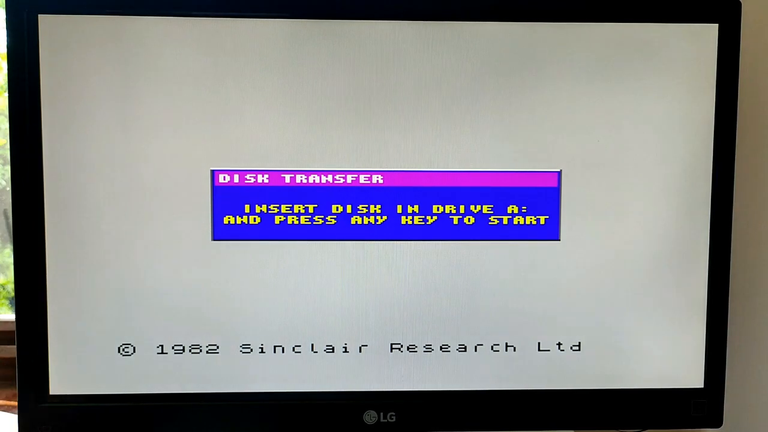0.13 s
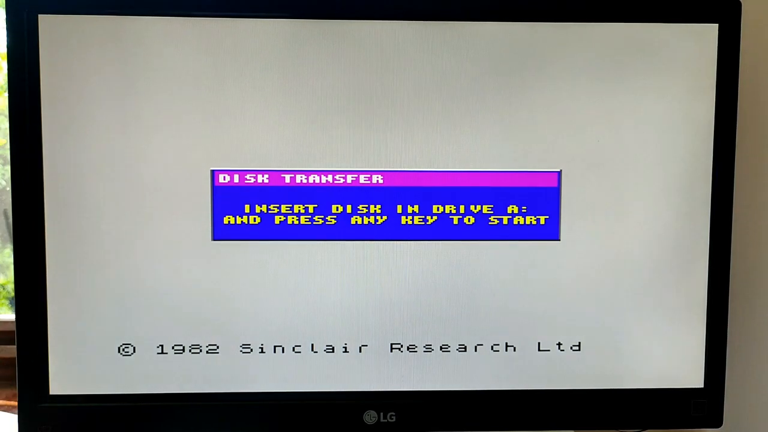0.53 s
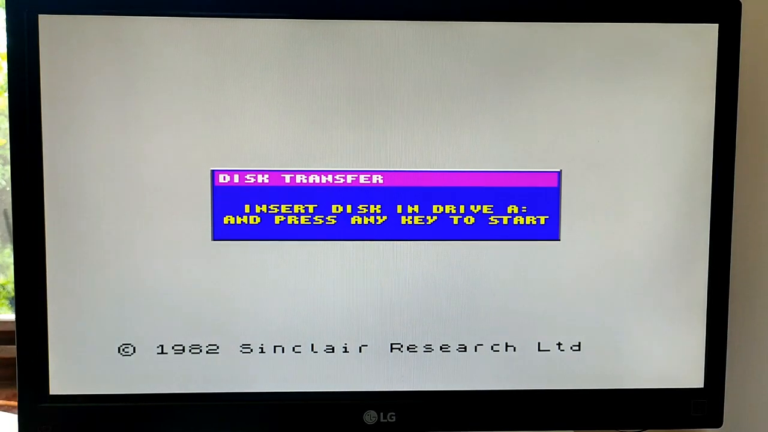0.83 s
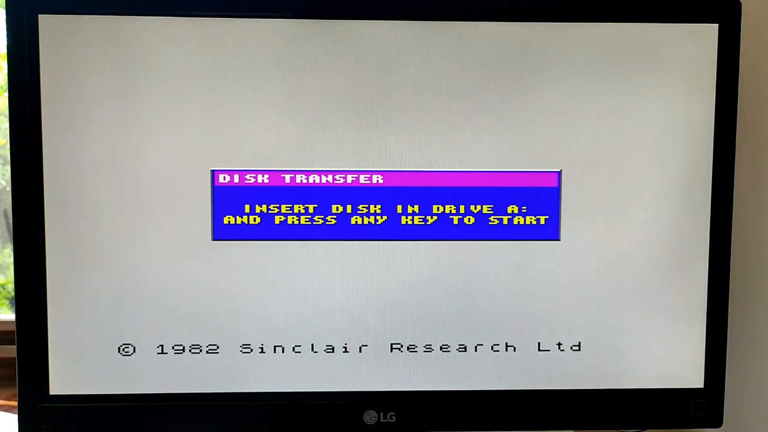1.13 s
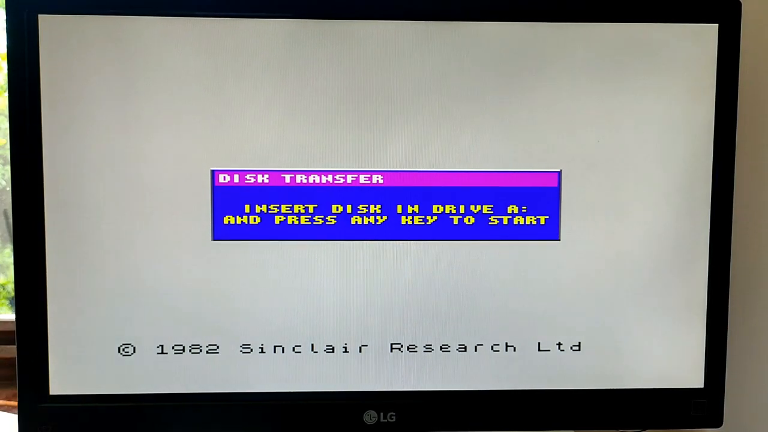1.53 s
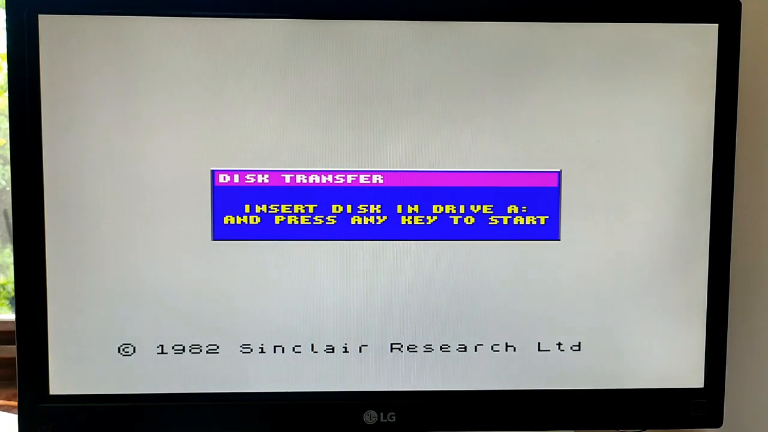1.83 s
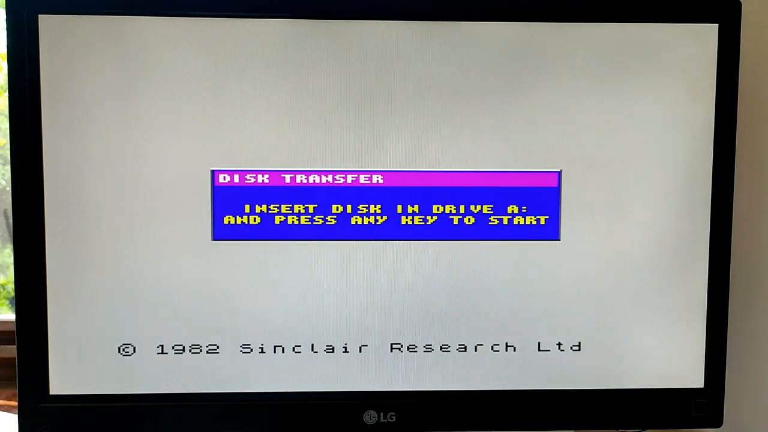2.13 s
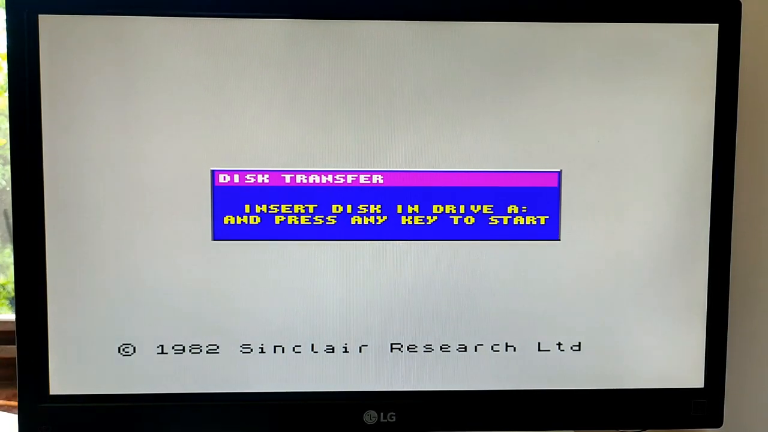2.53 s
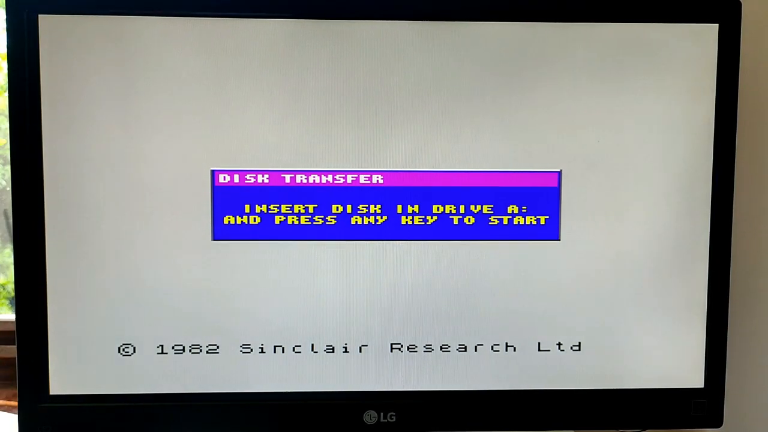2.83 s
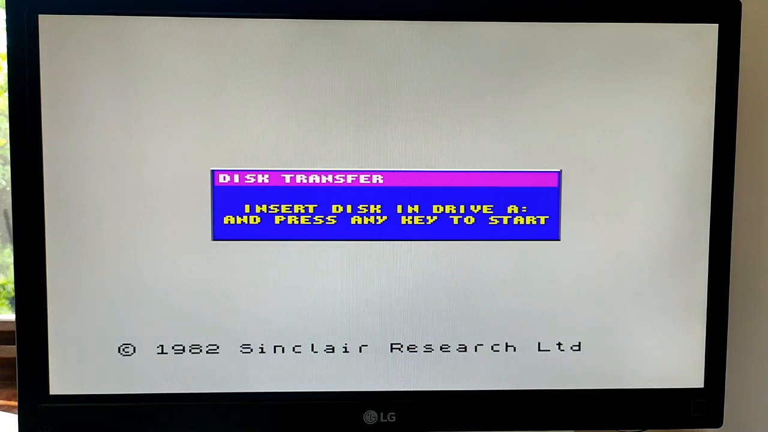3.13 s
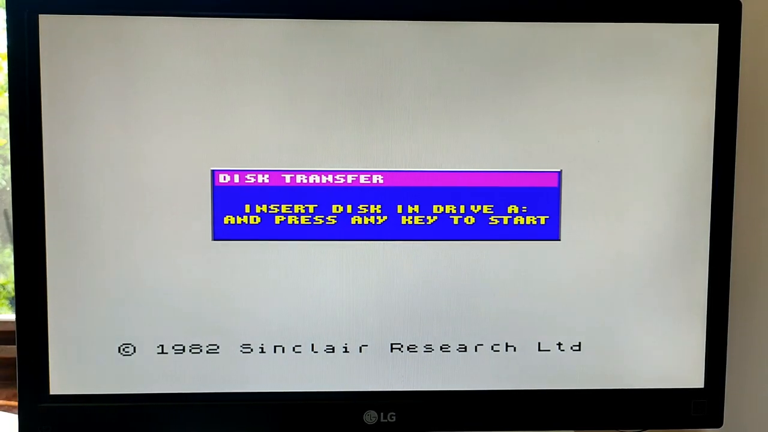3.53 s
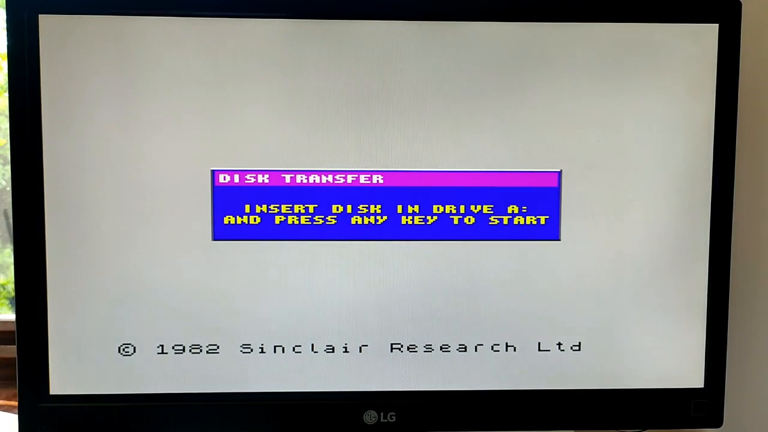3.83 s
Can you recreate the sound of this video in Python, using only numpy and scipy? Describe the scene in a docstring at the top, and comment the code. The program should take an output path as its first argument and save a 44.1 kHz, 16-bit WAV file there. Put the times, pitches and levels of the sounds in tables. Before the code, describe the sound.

Floppy disk handled near a computer: early clatter and scuffs, sparse light clicks, then insertion scrapes and a loud seating clack at the end. Constant airy fan hum, small room, slightly dull microphone with no extreme treble.

```python
"""A computer fan runs throughout: shaped noise for the rushing air, wavering sines for the hum and thin whine.
A plastic floppy disk is picked up with rattles and hollow notes, then slid and turned in the hand;
the scuffs are noise and tiny random slips through a sinking resonance.
Near the end it is pushed into a drive, which seats it with a loud clack: a rattle ringing the metal frame.
Heavier knocks boom in the desk, and a small room answers the clacks and scuffs."""
import sys
import numpy as np
from scipy import signal
from scipy.fft import rfft, irfft, next_fast_len
from scipy.io import wavfile
from scipy.ndimage import uniform_filter1d, map_coordinates

SR = 44100
rng = np.random.default_rng(int(sys.argv[2]) if len(sys.argv) > 2 else 0)


def output_pcm(signal):
    """Save a mono or channel-first signal as 16-bit PCM at the path in sys.argv[1].

    Samples are clipped to [-1, 1] before scaling.
    """
    pcm = np.clip(np.atleast_2d(signal).T, -1, 1) * 32767
    wavfile.write(sys.argv[1], SR, np.round(pcm).astype(np.int16))


N = 176400  # samples, 4 s

# Rushing air of the fan. Each row: frequency in Hz, relative level per Hz in dB.
FAN_AIR_COLOUR = [(25, -26), (60, -18), (100, -5), (160, 6.5), (230, -3.5), (310, 6.5), (360, -3.5),
                  (750, -1.5), (1000, -4), (1300, -15.5), (1800, -11.5), (2400, -21), (2750, -27.5),
                  (3100, -18.5), (3600, -12), (4150, -27.5), (5400, -36), (6300, -21), (6800, -38),
                  (8000, -49)]
# Narrow resonances in the fan's hiss. Each row: frequency in Hz,
# distance from the centre to 12 dB down in Hz, relative level in dB.
FAN_HISS_RINGS = [(1965, 34, -5), (2110, 63, -2.5), (2555, 56, -8), (2872, 25.5, 0.5), (2990, 52, 4.5),
                  (3425, 70, -18.5), (3725, 106, -5.5), (4430, 39, -7), (4670, 50, -6.5), (4870, 50, -18.5),
                  (5200, 45, -10.5), (5560, 63, -10.5), (5600, 50, -9.5), (6146, 220, -4),
                  (6400, 90, -10.5)]
# Fan and motor tones. Each row: frequency in Hz, rms level before wavering in dB.
FAN_MOTOR_TONES = [(282.4, -62), (435, -66.5), (644, -67), (762, -72), (805, -74.5), (846, -67.5),
                   (967, -82), (1129, -64), (2901, -76), (3730, -70.5), (6062, -74.5)]
FAN_AIR_DB, FAN_RINGS_DB = -58, -67  # rms before the patches
PATCH_DB = 2.5  # depth of the patches in the hiss
WAVER_HZ, WAVER_DB = 2.59, 1.5  # unsteadiness of the tones in pitch and level

# Decay of the room. Each row: frequency in Hz, t60 in seconds.
ROOM_DECAY = [(150, 0.5), (500, 0.29), (1500, 0.24), (4000, 0.22), (8000, 0.35)]
ROOM_DB = -2  # gain of the room's answer
# Microphone response. Each row: frequency in Hz, gain in dB.
MIC_RESPONSE = [(20, 1), (7200, 1.5), (7800, -3), (8300, -16.5), (8700, -34)]
TOP_HZ = 8635  # nothing passes the plastic's colour or the microphone above this

# Knocks that reach the desk. Each row: start in seconds, level in dB.
DESK_THUMPS = [(0.223, -55.5), (1.482, -49), (2.37, -64), (2.755, -50), (3.135, -53.5), (3.381, -53),
               (3.555, -44.5), (3.948, -27.5)]
# Resonances of the desk. Each row: frequency in Hz, level in dB, t60 in seconds.
DESK_MODES = [(122.7, -3, 0.1), (151, 0.5, 0.27), (279.5, -16.5, 0.22)]

# Hollow knocks, pitched by how the disk is held. Each row: start in seconds, pitch in Hz, level in dB.
HOLLOW_KNOCKS = [(.265, 301, -42.5), (.314, 303, -33.5), (0.321, 448, -37.5), (1.816, 615, -40.5),
                 (1.835, 616, -40), (2.369, 295, -40.5), (2.91, 299, -49), (3.382, 300.5, -39)]
KNOCK_T60_S, KNOCK_ATTACK_S = 0.16, 0.0014

# Sliding strokes. Each row: peak in seconds, rise from and fall to 20 dB down in seconds,
# relative level in dB, hollow body in dB, bright edge in dB, strength of the gliding resonance in dB.
SLIDE_STROKES = [(0.239, 0.034, 0.031, -42, 4.5, -3, 6), (.305, 0.075, 0.039, -41.5, 6.5, -3, 3.5),
                 (.435, 0.086, 0.052, -37.5, -2.5, -5.5, 3.5), (.495, 0.021, 0.071, -51, 5, 2, 3),
                 (0.801, 0.24, 0.25, -60.5, 4.5, -1.5, -1.5), (1.245, 0.036, 0.2, -76, 20, 12.5, -13),
                 (1.421, 0.094, 0.069, -65.5, 4, 6, -1), (1.834, 0.029, 0.08, -53.5, 7, -0.5, 3),
                 (1.969, 0.3, 0.15, -59, 8.5, 0, 1.5), (3.074, 0.039, 0.054, -62.5, 7, 7, -1),
                 (3.147, 0.04, 0.11, -60, 4.5, 2, 0), (3.415, 0.056, 0.032, -44.5, -5, 3.5, 3.5),
                 (3.535, 0.066, 0.053, -43, -8, 3, 3.5), (3.68, .03, 0.049, -59.5, -4, 0, -3),
                 (3.925, 0.034, 0.031, -47.5, 2.5, -1.5, -1)]
# Colour of sliding plastic. Each row: frequency in Hz, relative level per Hz in dB.
SLIDING_COLOUR = [(40, -51), (130, -21.5), (220, -4.5), (320, 6.5), (560, 4), (1400, 5), (2400, 1.5),
                  (3600, 2), (5000, -2.5), (5900, -4), (6500, 2.5), (7200, -8.5), (8000, -17)]
GRAINS_PER_S, GRAIN_SPREAD_DB = 3000, 2  # mean rate of the slips, spread of their levels
SCUFF_SHARE = 0.77  # steady noise against the slips
SLIP_UNEVEN_DB = 2.16
# Resonance at a stroke's peak, how fast it sinks, how wide it is.
GLIDE_HZ, GLIDE_OCT_PER_S, GLIDE_WIDTH_OCT = 2260, 8.8, 0.48

# Contacts of the disk. Each row: start in seconds, relative level in dB, hollow body in dB,
# bright edge in dB, rattle t60 in seconds.
DISK_CLACKS = [(0.1524, -33.5, 10.5, -5.5, 0.092), (0.2142, -39.5, 9.5, 6, 0.056),
               (0.292, -42, 2, -3.5, 0.081), (0.3141, -32, 3, -19, 0.052), (.597, -41.5, 2, -2, 0.13),
               (0.7487, -54.5, 2, 7.5, 0.083), (.8022, -60, -9, 6, 0.055), (1.4807, -38.5, -1, -3.5, .045),
               (1.8348, -51.5, 17, 6, 0.055), (1.9805, -50.5, -17, 6.5, 0.048), (2.3678, -49, 8, 6, 0.1),
               (2.756, -59, 16, -5, 0.042), (2.9, -53, -2, -2, 0.06), (2.907, -34, -5, -9, 0.041),
               (3.116, -54.5, 12, 5.5, 0.068), (3.3554, -51, 5, 3.5, 0.16), (3.3784, -38, 1, 2, 0.1),
               (3.403, -46.5, 12, -5, .06), (3.5085, -40, -7, 2.5, 0.049), (3.5526, -28, -4, -2.5, 0.075),
               (3.57, -43.5, 12, -8, 0.038), (3.9022, -41.5, -4, -4.5, 0.064), (3.9322, -34, -6, 6, 0.15),
               (3.9382, -17.5, -3, 1.5, 0.058), (3.947, -25, -6, 12, 0.025)]
# Colour of a contact. Each row: frequency in Hz, relative level per Hz in dB.
CONTACT_COLOUR = [(40, -37.5), (110, -20), (200, -12), (310, 3), (600, 1), (1200, 2), (1900, 1.4),
                  (2600, -1), (3400, 1), (5000, -7), (6700, -1), (8000, -16.5)]
# Rings of the disk shell. Each row: frequency in Hz, level in dB, t60 in seconds.
SHELL_MODES = [(405, -6.5, 0.21), (529, -4, 0.077), (836, -12, 0.14), (1166, 2, 0.09), (1857, -19, 0.14),
               (2964, 3, 0.054), (3646, -4.5, 0.14), (6600, -11.5, 0.22)]
# Rings of the drive's metal frame. Each row: frequency in Hz, level in dB, t60 in seconds.
FRAME_MODES = [(1104, -5, .15), (1520, -3, 0.1), (2050, 0, 0.048), (3400, -6, 0.018), (4370, -10.5, .14),
               (4570, 5.5, .08), (5520, -9, 0.099), (5800, -11, 0.14), (6374, -12, 0.16), (6939, -24, .14)]
INSERT_S = 3.3  # from here contacts ring the frame instead of the shell
SHELL_DB, FRAME_DB, ATTACK_S = -13, -21, 0.0021  # gains of the rings, rise of a contact
CLACK_TRIM_DB = 1.5  # lifts every contact
BODY_HZ, EDGE_HZ = 1410, 3200  # corners of the hollow and bright shelves


def amp(db):
    """Decibels to gain."""
    return 10 ** (np.asarray(db) / 20)


def unit(x):
    """Scaled to rms 1."""
    return x / np.sqrt(np.mean(x ** 2) + 1e-20)


def along(points, hz):
    """(Hz, value) points read along a log frequency axis."""
    f, v = np.transpose(points)
    return np.interp(np.log(hz + 1), np.log(f + 1), v)


def wobble(rate):
    """A smooth random curve, rate knots a second."""
    knots = rng.standard_normal(int(N * rate / SR) + 4)
    return map_coordinates(knots, [np.arange(N) * rate / SR])


def coloured(x, gain):
    """x through a gain that depends on frequency."""
    m = next_fast_len(len(x) + 4096)
    return irfft(rfft(x, m) * gain(np.fft.rfftfreq(m, 1 / SR)), m)[:len(x)]


def add(track, s, sound):
    """Mix a sound in at a time in seconds."""
    part = track[round(s * SR):]
    part[:len(sound)] += sound[:len(part)]


def patchy(x, depth_db):
    """Narrow bands of a hiss come and go on their own."""
    z = signal.stft(x, nperseg=1024)[2]
    across_bands = uniform_filter1d(rng.standard_normal(z.shape), size=4, axis=0)
    field = uniform_filter1d(across_bands, size=12, axis=1)  # smoothed over time
    return signal.istft(z * amp(depth_db * unit(field)), nperseg=1024)[1][:len(x)]


def ring(modes, t):
    """One decaying sine per mode, with a new strength and phase at each blow."""
    hz, db, t60 = np.transpose(modes)[:, :, None]
    level_db = db + rng.normal(0, 1.5, hz.shape)
    cycles = hz * t + rng.random(hz.shape)
    return amp(level_db - 60 * t / t60) * np.sin(2 * np.pi * cycles)


def tone(hz, body_db, edge_db):
    """Gain of a bass shelf and a treble shelf: where and how hard the plastic is touched."""
    body = body_db / (1 + (hz / BODY_HZ) ** 4)
    edge = edge_db * (1 - 1 / (1 + (hz / EDGE_HZ) ** 6))
    return amp(body + edge)


def plastic(x, colour, body_db, edge_db):
    """An excitation heard through the dense resonances of the plastic."""
    def gain(hz):
        return unit(amp(along(colour, hz)) * (hz < TOP_HZ)) * tone(hz, body_db, edge_db)
    return coloured(x, gain)


def hiss_peaks(f):
    """Gain of the fan's narrow resonances, added as rounded peaks."""
    return sum(amp(db) / (1 + ((f - hz) / width) ** 2) ** 2 for hz, width, db in FAN_HISS_RINGS)


def fan():
    """Rushing air, narrow hissing resonances and slightly unsteady blade and motor tones."""
    air = coloured(rng.standard_normal(N), lambda hz: amp(along(FAN_AIR_COLOUR, hz)))
    hiss = coloured(rng.standard_normal(N), hiss_peaks)
    out = patchy(amp(FAN_AIR_DB) * unit(air) + amp(FAN_RINGS_DB) * unit(hiss), PATCH_DB)
    for hz, db in FAN_MOTOR_TONES:
        phase = 2 * np.pi * np.cumsum(hz + WAVER_HZ * wobble(14)) / SR
        level = np.sqrt(2) * amp(db + WAVER_DB * wobble(9.8))  # rms to peak
        out += level * np.sin(phase)
    return out


def room(x):
    """The room's answer, a noise tail in which each frequency dies at its own speed."""
    hz, t, z = signal.stft(rng.standard_normal(SR // 2), SR, nperseg=256)
    decay = amp(-60 * t / along(ROOM_DECAY, hz)[:, None])
    tail = signal.istft(z * decay, SR, nperseg=256)[1]
    tail = tail * (1 - np.exp(-np.arange(len(tail)) / SR / 0.0063))  # soft onset
    return signal.fftconvolve(x, tail / np.linalg.norm(tail))[:N]


def thumps():
    """The desk's resonances boom briefly under the heavier knocks."""
    out, t = np.zeros(N), np.arange(SR // 2) / SR
    for s, db in DESK_THUMPS:
        boom = ring(DESK_MODES, t).sum(0)
        add(out, s, amp(db) * boom * (1 - np.exp(-t / 0.0058)))
    return out


def knocks():
    """A dull knock leaves one short hollow note, a decaying sine."""
    out, t = np.zeros(N), np.arange(SR // 3) / SR
    for s, hz, db in HOLLOW_KNOCKS:
        attack = 1 - np.exp(-t / KNOCK_ATTACK_S)
        add(out, s, amp(db - 60 * t / KNOCK_T60_S) * np.sin(2 * np.pi * hz * t) * attack)
    return out


def gliding(x, start_s, boost_db):
    """A broad resonance sinks as the disk slides; x starts at start_s relative to the stroke's peak."""
    hz, t, z = signal.stft(x, SR, nperseg=256)
    octaves = np.log2((hz[:, None] + 1) / GLIDE_HZ) + GLIDE_OCT_PER_S * (t + start_s)
    gain = amp(boost_db * np.exp(-(octaves / GLIDE_WIDTH_OCT) ** 2))
    return signal.istft(z * gain, SR, nperseg=256)[1][:len(x)]


def slides():
    """Plastic scuffs along in tiny slips that swell and fade unevenly with each stroke."""
    out = np.zeros(N)
    t = np.arange(-SR // 5, SR // 2) / SR  # zero at the stroke's peak
    for s, rise, fall, db, body_db, edge_db, glide_db in SLIDE_STROKES:
        slips = (rng.random(len(t)) < GRAINS_PER_S / SR) * rng.standard_normal(len(t))
        slips = slips * amp(GRAIN_SPREAD_DB * rng.standard_normal(len(t)))
        friction = unit(unit(slips) + SCUFF_SHARE * rng.standard_normal(len(t)))
        scuff = plastic(gliding(friction, t[0], glide_db), SLIDING_COLOUR, body_db, edge_db)
        swell = amp(db - 20 * np.maximum(-t / rise, t / fall) ** 1.24)
        add(out, s + t[0], scuff * swell)
    return patchy(out, SLIP_UNEVEN_DB)


def clacks():
    """Each contact is a short rattle that rings the shell or, once in the slot, the drive frame."""
    out, t = np.zeros(N), np.arange(SR // 3) / SR
    attack = 1 - np.exp(-(t / ATTACK_S) ** 2)
    for s, db, body_db, edge_db, t60 in DISK_CLACKS:
        modes, ring_db = (SHELL_MODES, SHELL_DB) if s < INSERT_S else (FRAME_MODES, FRAME_DB)
        burst = rng.standard_normal(len(t)) * attack * amp(-60 * t / t60)
        rattle = plastic(burst, CONTACT_COLOUR, body_db, edge_db)
        # the touch weights every mode, then the modes are summed
        rung = tone(np.array(modes)[:, 0], body_db, edge_db) @ ring(modes, t) * attack
        add(out, s, amp(db + CLACK_TRIM_DB) * (rattle + amp(ring_db) * rung))
    return out


def scene():
    """The handling in its room, over the fan; hollow notes and desk booms stay dry."""
    hits, scuffs = clacks(), slides()
    answer = amp(ROOM_DB) * (room(hits) + room(scuffs))
    return (fan() + answer + thumps() + knocks() + scuffs + hits)[None]


def record(dry):
    """A narrow-band microphone with a steep upper limit."""
    def gain(hz):
        return amp(along(MIC_RESPONSE, hz)) * (hz < TOP_HZ)
    return np.array([coloured(c, gain) for c in dry])


dry = scene()
out = record(dry)
output_pcm(out)
```